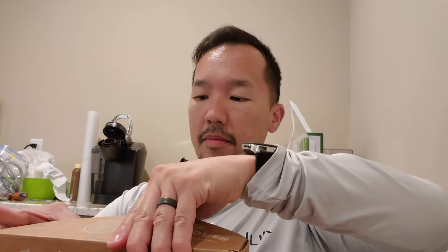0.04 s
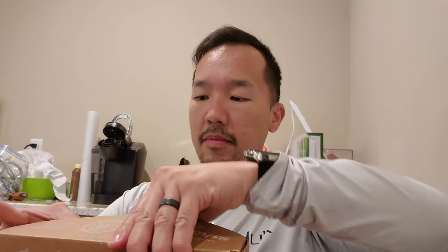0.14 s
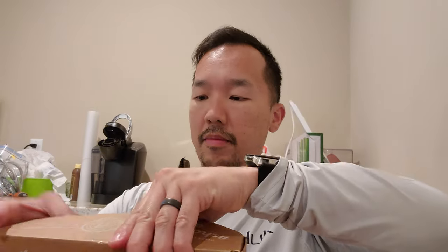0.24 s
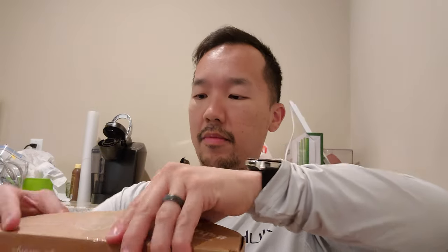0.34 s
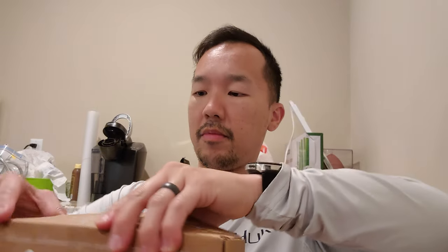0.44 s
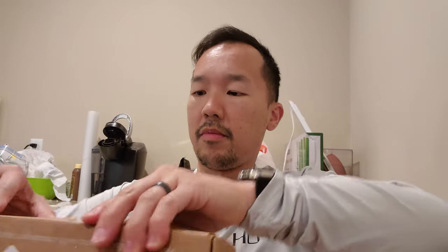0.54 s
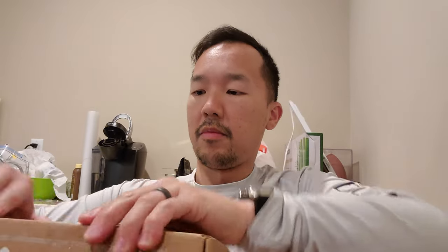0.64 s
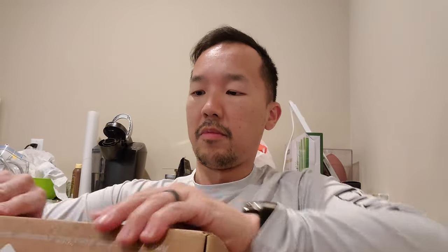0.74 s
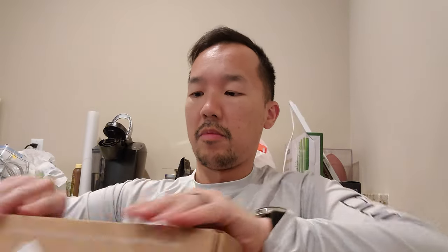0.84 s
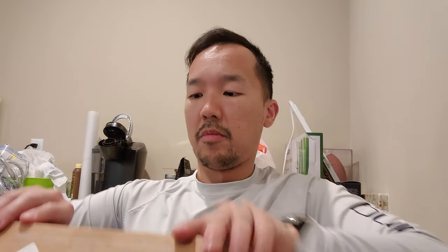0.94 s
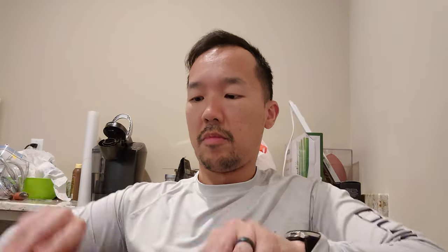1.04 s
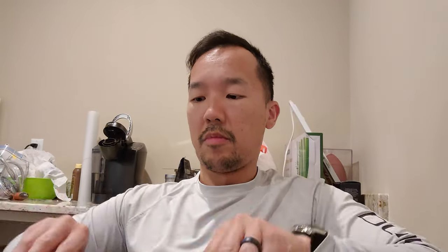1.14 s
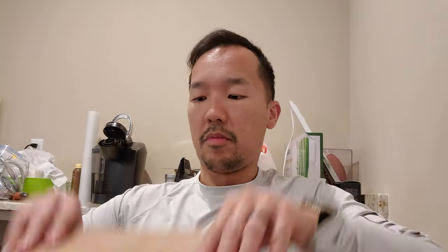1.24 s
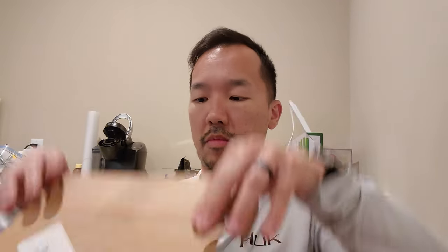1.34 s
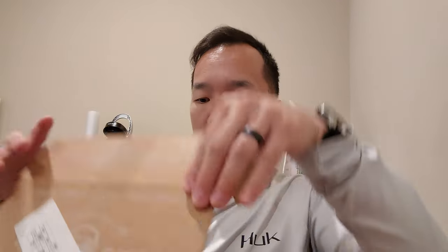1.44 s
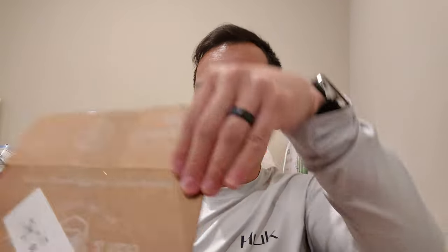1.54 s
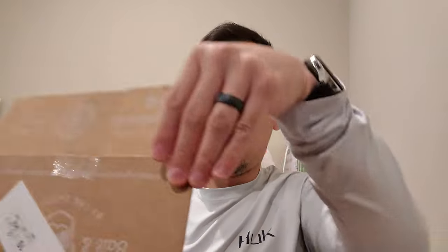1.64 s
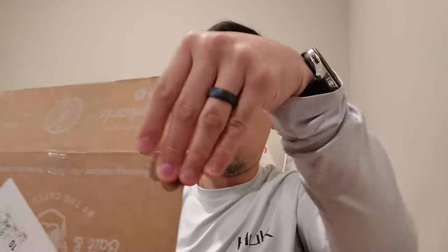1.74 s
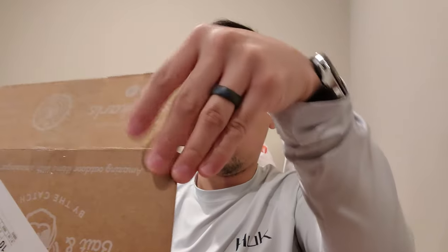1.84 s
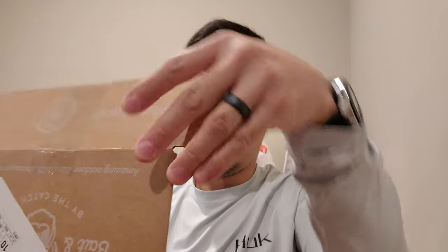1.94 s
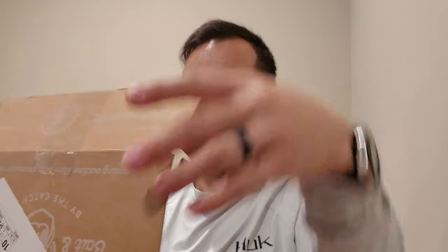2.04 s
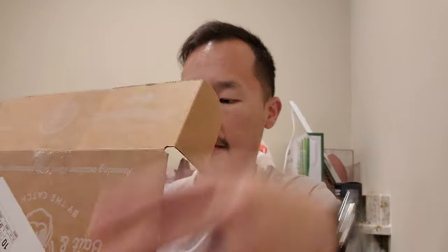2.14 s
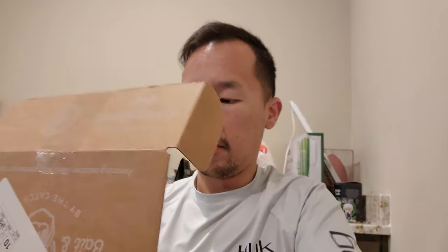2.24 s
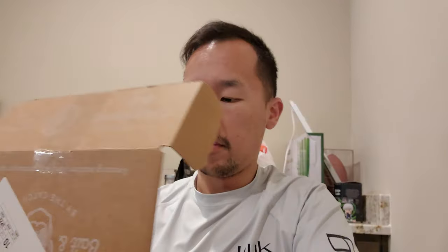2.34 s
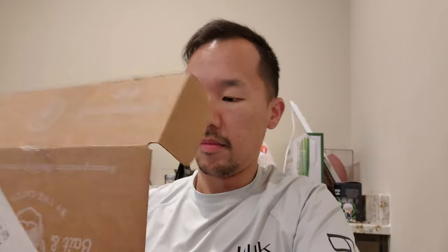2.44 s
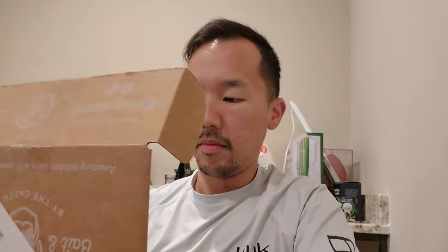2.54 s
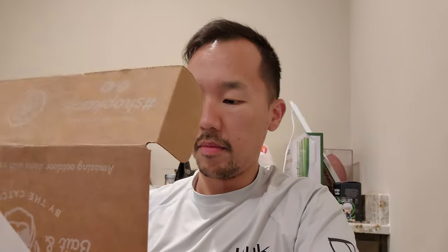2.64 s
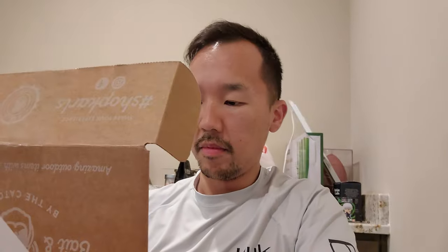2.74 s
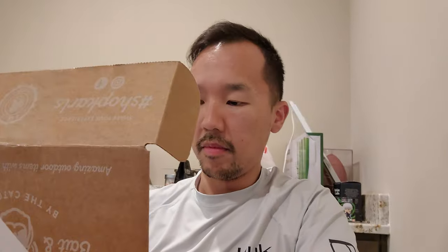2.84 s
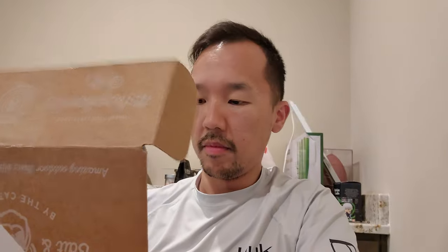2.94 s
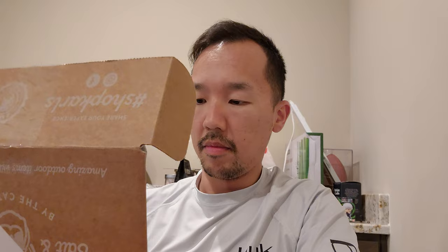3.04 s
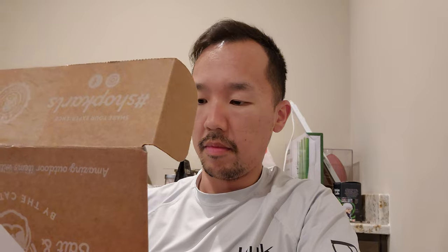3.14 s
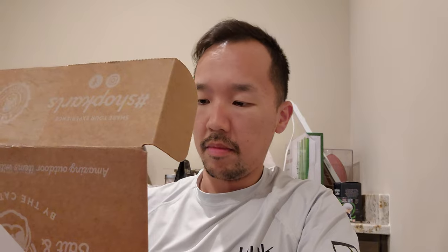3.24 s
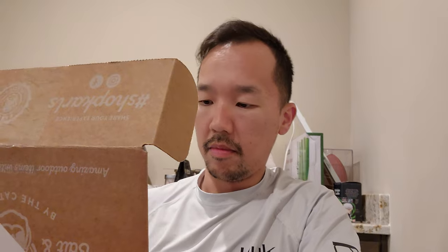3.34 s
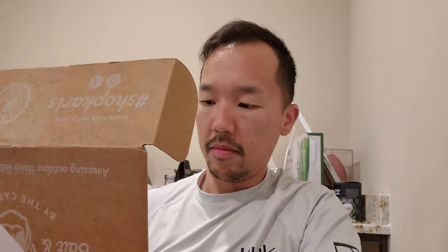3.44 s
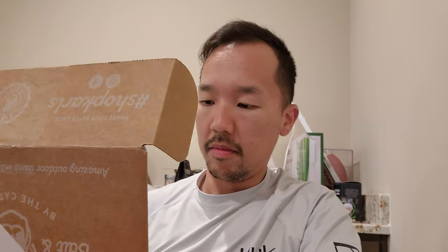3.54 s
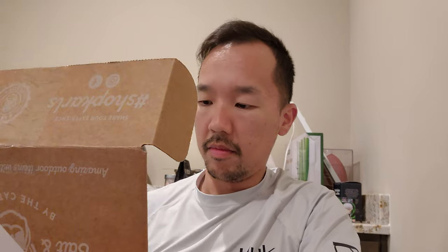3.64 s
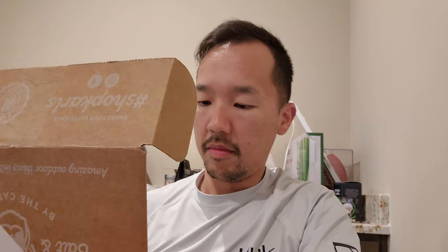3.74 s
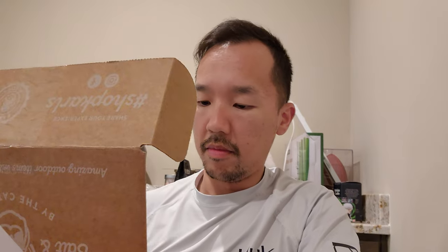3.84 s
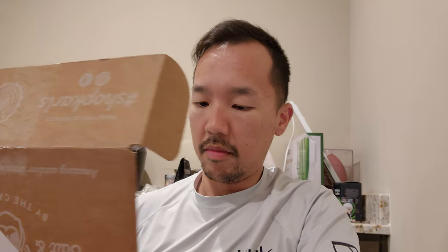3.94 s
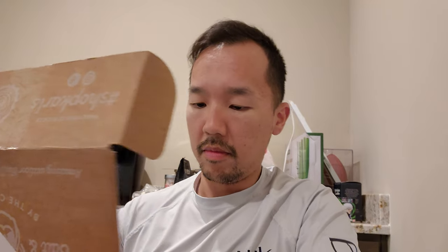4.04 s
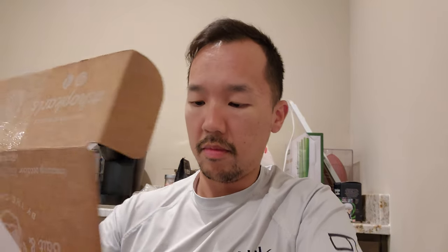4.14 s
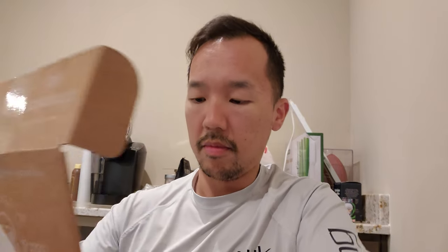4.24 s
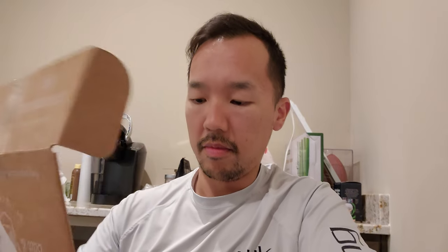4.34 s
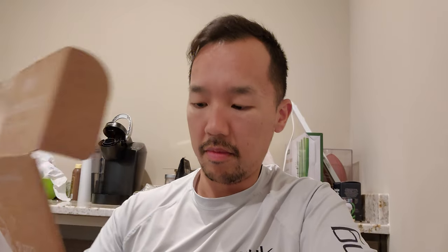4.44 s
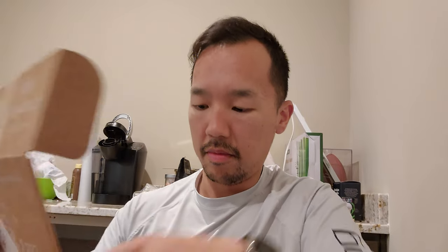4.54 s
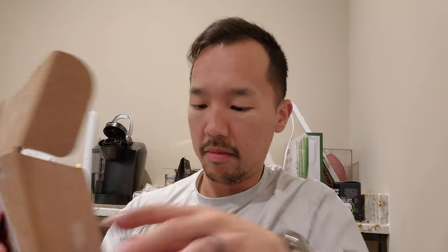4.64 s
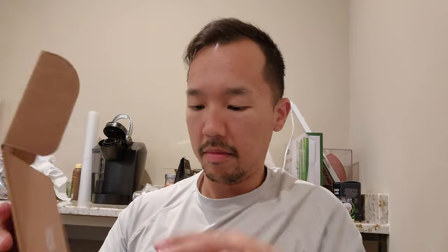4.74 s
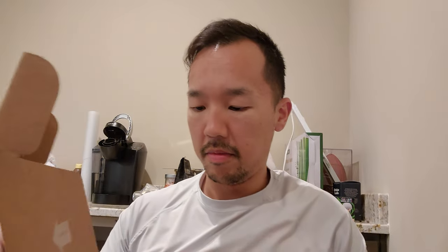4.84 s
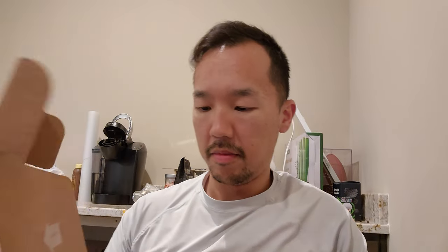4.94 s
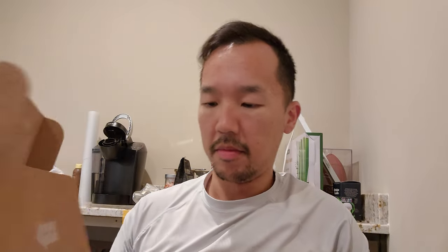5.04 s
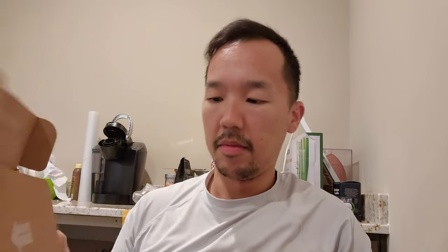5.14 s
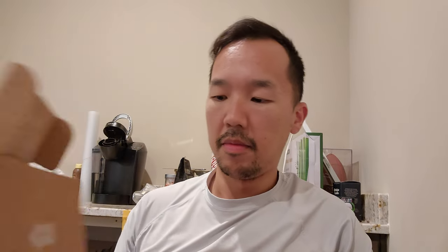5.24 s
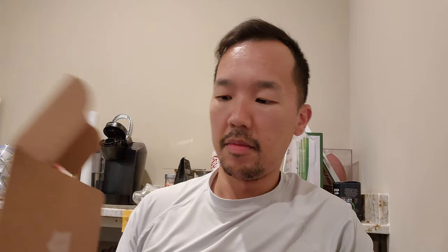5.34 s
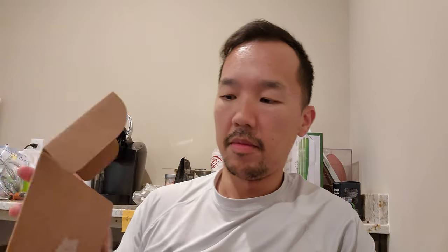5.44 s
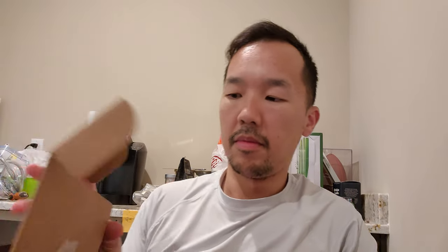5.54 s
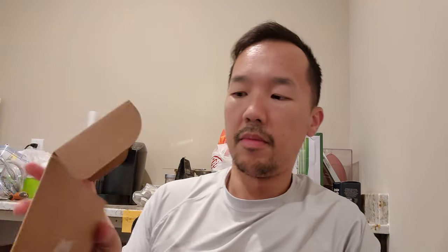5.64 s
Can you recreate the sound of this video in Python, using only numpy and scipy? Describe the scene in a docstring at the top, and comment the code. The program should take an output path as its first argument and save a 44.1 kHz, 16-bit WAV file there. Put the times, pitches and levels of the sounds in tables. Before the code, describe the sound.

Fingers tap and slide on a cardboard box lid, a tucked flap creaks and pops out with two thumps, then card rubs and knocks softly.

```python
"""Fingers slide and tap over the lid of a cardboard mailer box, close to the microphones in a small kitchen.
The tucked flap creaks, pops loose and scrapes out with two loud thumps; the lid is swung up and its
side flaps rub and knock against the walls of the box. Rubbing is coloured noise made of random snags,
knocks are decaying panel tones with a noisy crunch, creaks are short pips and rasps are wavering tones.
The counter top and the walls echo it all over a faint steady room murmur."""
import sys
import numpy as np
from scipy import signal
from scipy.fft import rfft, irfft
from scipy.io import wavfile
from scipy.ndimage import map_coordinates

SR = 44100
rng = np.random.default_rng(int(sys.argv[2]) if len(sys.argv) > 2 else 0)


def transcribe(signal):
    """Save signal, clipped to [-1, 1], as a 16-bit WAV file at the path in sys.argv[1]."""
    frames = np.atleast_2d(signal).T
    limited = np.clip(frames, -1, 1)
    pcm = np.round(limited * 32767).astype(np.int16)
    wavfile.write(sys.argv[1], SR, pcm)


N = 251370   # samples, 5.7 s
BANDS = 31.25 * 2 ** (np.arange(19) / 2)   # half-octave centres, Hz

# resonances of the box: mode_hz [Hz], relative_level_db [dB], t60_s [s, before each blow's ring factor]
BOX_RESONANCES = [(84, -19, .1), (120, -4, .26), (163, 1, .28), (186, -8, .55), (276, -6, .22),
                  (303, -5, .32), (365, -7, .45), (480, -5, .2), (630, -8, .2), (711, -8, .26),
                  (874, -7, .2), (988, -7, .2), (1108, -10, .25), (1528, -7, .14), (2080, -9, .14),
                  (2248, -10, .12), (3508, -14, .09)]
# friction spectrum of gripping fingers and of the wedged flap: freq_hz [Hz], relative_density_db [dB per Hz]
GRIP_SPECTRUM = [(60, -6.5), (130, -6), (350, 2), (650, -6.5), (950, -5.5), (1300, -6), (1700, -8),
                 (2800, -16), (4000, -15.5), (6400, -23.5), (9300, -35.5), (12500, -26.5), (16000, -29)]


def from_db(db):
    """Decibels to gain."""
    return 10 ** (np.asarray(db) / 20)


def rms_one(x):
    """Scale to unit power."""
    return x / np.sqrt(np.mean(x ** 2) + 1e-20)


def at_hz(points, hz):
    """Read a table along log frequency."""
    f, value = np.transpose(points)
    return np.interp(np.log(np.maximum(hz, 1)), np.log(f), value)


def rfft_hz(size):
    """Frequencies of the bins of a transform."""
    return np.arange(size // 2 + 1) * SR / size


def cut(x, hz, kind, order=2):
    """Causal Butterworth filter."""
    return signal.sosfilt(signal.butter(order, hz, kind, fs=SR, output="sos"), x)


def band_noise(size):
    """Independent half-octave noises, one row per band, each of unit power."""
    edge, run_in = 2 ** (1 / 4), 4000   # band edge ratio; samples dropped while the filter settles
    rows = []
    for hz in BANDS:
        noise = cut(rng.standard_normal(size + run_in), [hz / edge, hz * edge], "band")
        rows.append(rms_one(noise[run_in:]))
    return np.array(rows)


def wander(size, per_s):
    """Random knots joined by straight lines, scaled to a spread of about one."""
    knots = rng.standard_normal(400)
    position = np.arange(size) * per_s / SR
    return map_coordinates(knots, [position], order=1, mode="wrap") * np.sqrt(3 / 2)


def dying(t, t60):
    """Free exponential decay, 60 dB down after t60 seconds."""
    return np.exp(-np.log(1000) * t / np.maximum(t60, 1e-3))


def add(track, s, sound):
    """Mix a sound into a track at a time in seconds."""
    start = max(round(s * SR), 0)
    track[..., start:start + sound.shape[-1]] += sound[..., :N - start]


def pair(mid, side, hz):
    """Two close microphones hear diffuse sound alike only in the bass."""
    # left-right correlation of diffuse sound: freq_hz [Hz], correlation [-1 to 1]
    likeness = [(100, 0.9), (260, 0.92), (1000, -0.11), (5000, 0.13)]
    alike = np.clip(at_hz(likeness, hz), -.99, .99)
    return np.sqrt(1 + alike) * mid + np.sqrt(1 - alike) * side * np.array([[1], [-1]])


def pan(x, left_db):
    """Place a sound between the microphones by the left-over-right level difference."""
    return x * from_db([[left_db / 2], [-left_db / 2]])


def air():
    """The faint steady murmur of the room: diffuse noise shaped band by band."""
    # murmur spectrum: freq_hz [Hz], relative_density_db [dB per Hz]
    murmur = [(30, -14), (90, 0), (250, -2), (900, -14), (1250, -21), (2000, -18), (6000, -24), (9300, -33),
              (12000, -31), (16000, -38)]
    level_db = -69.5   # RMS ahead of the microphone filters
    total = 0
    for hz, mid, side in zip(BANDS, band_noise(N), band_noise(N)):
        band_gain = from_db(at_hz(murmur, hz)) * np.sqrt(hz)   # a wider band holds more power
        total = total + pair(mid, side, hz) * band_gain
    return from_db(level_db) * rms_one(total)


def wall_echoes(first_echo_s=0.0042, build_s=0.002):
    """Diffuse echoes from one position of the box; they die at their own rate in each band."""
    # decay of the kitchen: freq_hz [Hz], t60_s [s]
    decay = [(120, 0.3), (3000, 0.41), (15000, 0.25)]
    # echo level against the direct sound: freq_hz [Hz], level_db [dB]
    echo_level = [(100, -6), (300, -10), (1000, -3), (12000, 4)]
    t = np.arange(int(SR * .7)) / SR
    onset = np.clip((t - first_echo_s) / build_s, 0, 1)
    response = 0
    for hz, mid, side in zip(BANDS, band_noise(len(t)), band_noise(len(t))):
        shape = onset * dying(t, at_hz(decay, hz))
        share = hz * np.log(2) / SR   # part of the whole spectrum in this half octave
        gain = np.sqrt(share / len(t)) * from_db(at_hz(echo_level, hz))
        response = response + rms_one(pair(mid, side, hz) * shape) * gain
    return response


def kitchen(x, turns_per_s=3.0):
    """As the box moves, its sound passes back and forth between two patterns of wall echoes."""
    angle = 2 * np.pi * turns_per_s * np.arange(N) / SR
    out = 0
    for share in (np.cos(angle), np.sin(angle)):
        out = out + signal.fftconvolve((x * share)[None], wall_echoes(), axes=1)[:, :N]
    return out


def counter_echo(x, echo_db=-5.0, above_hz=1300):
    """The counter top throws the treble back, by a different path to each microphone."""
    out = np.zeros((2, N))
    for channel, lag_s in enumerate([.0013, .0021]):
        add(out[channel], lag_s, from_db(echo_db) * cut(x, above_hz, "high", order=1))
    return out


def creak(trim_db):
    """Each slip of the wedged flap is a short hollow pip that swells over a cycle or two."""
    # jerks of the flap: start_s [s], level_db [dB, before the trim]
    slips = [(.803, -51), (.808, -50), (.823, -47), (.836, -48), (.848, -48), (.858, -48), (.867, -52)]
    # resonances of the flap: mode_hz [Hz], relative_level_db [dB], t60_s [s]
    flap_modes = [(905, -3, .018), (1005, 2, .02), (1110, -2, .018)]
    out, t = np.zeros(N), np.arange(SR // 10) / SR
    ringing = sum(from_db(db) * np.sin(2 * np.pi * hz * t) * dying(t, t60) for hz, db, t60 in flap_modes)
    pip = (1 - np.exp(-t / .001)) * ringing
    for s, db in slips:
        add(out, s, from_db(db + trim_db) * pip)
    return cut(out, [650, 2200], "band")


def colour(x, spectrum, peak_db=0.8, mode_width=0.012):
    """The transform of friction: a broad spectrum with the modes of the box standing out of it."""
    hz = rfft_hz(len(x))
    modes = np.array(BOX_RESONANCES)[:, :1]
    near_mode = (1 / (1 + ((hz - modes) / (mode_width * modes)) ** 2)).max(0)
    return rfft(x) * from_db(at_hz(spectrum, hz) + peak_db * near_mode)


def rub(gesture, spectrum, snags_per_s, trim_db=1.3):
    """Card drags over card: fibres snag and let go at random, shaking the panel and hissing at the edge."""
    # strokes: gesture, start_s, swell_s, hold_s, fade_t60_s [s],
    # scrape_db, panel_rumble_db, fibre_hiss_db [dB, before the trim]
    strokes = [("grip", 0.0, .02, .075, .11, -66, -64, -77), ("grip", 0.185, .012, .16, .2, -74, -66, -80),
               ("grip", 0.41, .03, .08, .2, -69, -60, -73), ("grip", 0.54, .05, .02, .1, -57, -49, -59),
               ("grip", 0.63, .02, .055, .35, -54.5, -48.5, -62),
               ("wedge", 0.75, .03, .08, .15, -67, -64, -75),
               ("wedge", 0.89, .02, .003, .08, -49, -44, -55),
               ("pull", 0.908, .007, .01, .18, -38, -38, -53),
               ("pull", 0.925, .03, .033, .16, -42.5, -40.5, -51),
               ("pull", 1.015, .025, .115, .13, -49, -47, -57),
               ("pull", 1.18, .045, .008, .37, -48, -42.5, -55.5),
               ("pull", 1.29, .04, .06, .75, -67, -58, -69), ("lift", 1.82, .1, .035, .12, -57.5, -57, -69),
               ("lift", 2.01, .025, .005, .15, -62, -61, -63),
               ("lift", 2.26, .05, .005, .17, -60, -62, -57), ("lift", 2.36, .02, .1, .8, -77, -68, -80),
               ("shift", 2.974, .015, .012, .16, -65, -60, -74),
               ("shift", 3.03, .02, .07, .12, -76, -67, -90), ("shift", 3.13, .02, .055, .2, -70, -67, -82),
               ("shift", 3.19, .028, .015, .11, -64, -80, -63),
               ("swing", 4.233, .025, .18, .2, -60.5, -63, -65),
               ("swing", 4.44, .015, .1, .15, -60, -60, -64), ("swing", 4.29, .03, .1, .2, -65, -56, -73),
               ("swing", 4.555, .04, .006, .18, -51, -55, -55.5),
               ("swing", 4.68, .04, .005, .18, -69, -65, -71),
               ("swing", 4.805, .012, .07, .3, -74, -69, -80),
               ("flap", 4.977, .03, .015, .08, -60, -60, -68),
               ("flap", 5.02, .025, .005, .09, -57, -57.5, -61),
               ("fold", 5.15, .055, .015, .13, -57, -53.5, -60),
               ("fold", 5.25, .03, .035, .14, -63, -59, -65), ("fold", 5.48, .09, .012, .17, -68, -64, -72),
               ("fold", 5.678, .024, .01, .2, -60, -62, -63)]
    # a wide panel reaches the two microphones out of step: freq_hz [Hz], phase_spread [radians]
    panel_spread = [(200, .05), (1000, .3), (5000, .7)]
    rows = np.array([row[1:] for row in strokes if row[0] == gesture])
    s, swell_s, hold_s, fade_t60, scrape_db, rumble_db, hiss_db = rows.T[:, :, None]
    size, out = 2 ** 16, np.zeros((2, N))
    t, hz = s.min() + np.arange(size) / SR, rfft_hz(size)

    # each stroke gathers speed, holds it and dies away
    fade = dying(np.maximum(t - s - swell_s - hold_s, 0), fade_t60)
    speed = np.clip((t - s) / swell_s, 0, 1) * fade

    snag_spread_db, smooth_db = 4.5, -7   # uneven snag strength; steady noise under the snags
    snag_db = snag_spread_db * np.minimum(rng.exponential(1, size), 3)
    snags = (rng.random(size) < snags_per_s / SR) * rng.choice([-1, 1], size) * from_db(snag_db)
    friction = rms_one(snags) + from_db(smooth_db) * rng.standard_normal(size)
    friction = colour(friction, spectrum)
    phase = at_hz(panel_spread, hz) * wander(len(hz), 120)   # wanders along frequency
    friction = friction * np.exp(1j * phase * [[1], [-1]])

    def part(low, high):
        """The friction between two frequencies."""
        return irfft(friction * ((hz >= low) & (hz < high)))

    def range_level(low, high, db):
        """The strokes' level over time, divided by the loudness of the friction in this range."""
        return np.linalg.norm(speed * from_db(db + trim_db), axis=0) / part(low, high).std()

    # rumble, scrape and hiss each have their own level and blend into one another
    rumble = range_level(60, 1150, rumble_db)
    scrape = range_level(1150, 5500, scrape_db)
    hiss = range_level(5500, 16000, hiss_db)
    patchy_db, patches_per_s, judder_db, judders_per_s = 2.4, 40, 2.8, 60
    edges, stroke = np.geomspace(40, 17000, 34), 0   # band edges, Hz
    for low, high in zip(edges, edges[1:]):
        deep = at_hz([(800, 1), (1500, 0)], low)
        bright = at_hz([(4400, 0), (6500, 1)], low)
        level = rumble ** deep * scrape ** (1 - deep - bright) * hiss ** bright
        # the moving contact favours now some panel modes, now others
        patches = from_db(patchy_db * wander(size, patches_per_s))
        stroke = stroke + part(low, high) * level * patches
    add(out, s.min(), stroke * from_db(judder_db * wander(size, judders_per_s)))
    return out


def grip():
    """Fingers slide over the lid, the friction shaking the whole panel."""
    return rub("grip", GRIP_SPECTRUM, snags_per_s=1200)


def wedge():
    """The wedged flap rubs in its slot, to the right."""
    return pan(rub("wedge", GRIP_SPECTRUM, snags_per_s=1100), left_db=-3.0)


def pull():
    """The tucked flap scrapes out, card against card."""
    # friction spectrum: freq_hz [Hz], relative_density_db [dB per Hz]
    spectrum = [(60, -13), (120, -2), (450, 1.5), (1000, -7.5), (1300, -17), (2050, -13.5), (2800, -21),
                (3900, -18), (5300, -22), (6600, -15), (9500, -23), (12500, -15), (16000, -17)]
    return rub("pull", spectrum, snags_per_s=1300)


def lift():
    """Card rubs as the lid is lifted, slightly to the right."""
    # friction spectrum: freq_hz [Hz], relative_density_db [dB per Hz]
    spectrum = [(60, 8), (120, 10.5), (350, 7), (680, -5.5), (920, -2.5), (1200, -7), (1650, 0),
                (2200, 3.5), (2800, -5), (3800, -2), (5200, -16), (9300, -48.5), (12000, -37), (16000, -40)]
    return pan(rub("lift", spectrum, snags_per_s=1200), left_db=-1.0)


def shift():
    """Short shifting rubs with dense snags."""
    # friction spectrum: freq_hz [Hz], relative_density_db [dB per Hz]
    spectrum = [(70, -4), (250, 3), (700, -2), (1200, -3), (1700, 6), (2700, 6.5), (4200, 4.5),
                (9300, -21.5), (12000, -13), (16000, -24)]
    return rub("shift", spectrum, snags_per_s=3400)


def swing():
    """Card rubs with dense snags as the lid swings up."""
    # friction spectrum: freq_hz [Hz], relative_density_db [dB per Hz]
    spectrum = [(60, -21), (130, -3), (260, -1.5), (680, -8), (900, -8), (1250, -20.5), (2150, -18.5),
                (2750, -20.5), (3400, -17.5), (4600, -20), (5600, -17), (9300, -32.5), (11500, -26.5),
                (16000, -31)]
    return rub("swing", spectrum, snags_per_s=3200)


def flap():
    """A side flap rubs against the box wall, slightly to the left."""
    # friction spectrum: freq_hz [Hz], relative_density_db [dB per Hz]
    spectrum = [(80, -4), (350, 5), (740, 11), (950, -2), (1280, -15), (1700, -10), (2120, -2), (2700, -17),
                (4400, -6), (5200, -18), (6000, -18), (9000, -28), (16000, -22)]
    return pan(rub("flap", spectrum, snags_per_s=1600), left_db=1.2)


def fold():
    """The closing rubs, card folding against card."""
    # friction spectrum: freq_hz [Hz], relative_density_db [dB per Hz]
    spectrum = [(70, -16), (150, -5), (290, 6), (390, -5), (490, 3), (680, -8), (900, -4), (1250, -13),
                (1750, -7), (2650, -14), (3900, -8), (6500, -20), (9300, -36), (11500, -26), (16000, -29)]
    return rub("fold", spectrum, snags_per_s=2200)


def rasps(judder_db=3):
    """Stick and slip drive one resonance of the dragged edge; it swells, judders, wavers and sinks in pitch."""
    # singing edges, pitched by where they are held: start_s, length_s [s], pitch_hz, width_hz [Hz], level_db [dB]
    edge_rasps = [(0.177, .05, 1550, 250, -60), (0.96, .04, 2150, 450, -45), (0.958, .05, 4000, 600, -49),
                  (1.165, .045, 3700, 400, -54), (1.218, .03, 5550, 900, -53), (1.86, .11, 2230, 400, -60),
                  (4.243, .055, 5750, 1700, -63), (4.305, .05, 1900, 900, -62),
                  (4.448, .05, 5700, 1700, -62), (4.98, .085, 2120, 380, -60), (4.982, .065, 730, 220, -59),
                  (4.995, .07, 4300, 1300, -63), (5.19, .11, 900, 220, -63), (5.292, .04, 5700, 800, -63),
                  (5.497, .065, 3300, 400, -68)]
    waver, sag = .015, .04   # shares by which the pitch wanders, and starts high and ends low
    out = np.zeros(N)
    for s, length_s, hz, width_hz, db in edge_rasps:
        size = int(length_s * SR)
        pitch = hz * (1 + sag * np.linspace(1, -1, size) + waver * wander(size, 50))
        phase = 2 * np.pi * np.cumsum(pitch) / SR
        # random sidebands widen the tone
        tone = wander(size, width_hz) * np.cos(phase) + wander(size, width_hz) * np.sin(phase)
        swell = np.sin(np.linspace(0, np.pi, size)) * from_db(judder_db * wander(size, 250))
        add(out, s, from_db(db) * rms_one(tone * swell))
    return out


def contacts():
    """Knocks, thuds and snaps as (start, pitch, force spectrum, ring factor); the spot hit sets the pitch."""
    # a card edge knocks on the box: start_s [s], force_db [dB], pitch_hz [Hz],
    # fall_above_pitch [dB per octave], crack_db [dB], ring_factor [times t60]
    knocks = [(0.176, -41, 350, 8, -55, .5), (0.198, -41, 310, 14, -64, .7), (0.301, -53, 750, 6, -57, .6),
              (0.407, -51, 650, 6, -62, .43), (0.550, -35, 410, 7, -56, .35),
              (0.569, -35, 340, 5, -45, .45), (0.589, -41, 450, 3, -39, .35), (0.619, -40, 780, 8, -60, .4),
              (0.638, -38, 230, 7, -49, .3), (0.665, -34, 400, 9, -42, .3), (0.908, -25, 390, 1, -38, .6),
              (0.916, -22, 560, 2, -36, .34), (1.000, -31, 320, 5, -48, .4), (1.034, -42, 800, 3, -47, .4),
              (1.163, -22, 400, 5, -30, .65), (1.192, -30, 370, 7, -41, .7), (1.222, -32, 290, 9, -47, .85),
              (1.243, -34, 430, 10, -60, .6), (1.393, -55, 450, 5, -52, .89),
              (1.947, -41, 330, 7, -50, .45), (2.343, -45, 280, 7, -53, .43), (2.992, -50, 520, 5, -57, .4),
              (3.089, -47, 480, 6, -62, .39), (3.255, -42, 450, 24, -62, .75),
              (4.353, -38, 290, 11, -58, .65), (4.571, -45, 380, 12, -65, .35),
              (4.604, -44, 250, 8, -56, .6), (5.043, -53, 340, 4, -56, .8), (5.274, -34, 490, 10, -52, .45),
              (5.277, -35, 265, 8, -55, .55), (5.299, -37, 260, 8, -56, .5)]
    # force of the crack in a knock: freq_hz [Hz], relative_force_db [dB against crack_db]
    crack_force = [(1300, -6), (2100, -.5), (4000, 1), (8200, -18), (13000, -12)]
    # a whole panel is bumped softly: start_s [s], force_db [dB], pitch_hz [Hz], ring_factor [times t60]
    thuds = [(0.177, -46, 125, .6), (0.637, -34, 140, .2), (0.664, -32, 130, .25), (0.909, -25, 175, .4),
             (0.954, -38, 135, .6), (1.161, -26, 163, .85), (1.198, -28, 115, .35), (1.850, -39, 85, .25),
             (1.888, -36, 88, .18), (2.263, -49, 170, .45), (2.311, -28, 130, .17), (4.237, -40, 100, .2),
             (4.353, -43, 165, .5), (4.600, -46, 122, .6), (4.811, -50, 140, .3), (4.857, -50, 180, .35),
             (5.468, -51, 205, .4)]
    # faint rattle in a thud: freq_hz [Hz], relative_force_db [dB against the thud]
    rattle_force = [(1000, -40), (3000, -33), (13000, -41)]
    # stiff fibres snap: start_s [s], force_db [dB], pitch_hz [Hz]
    snaps = [(0.047, -47, 6000), (0.301, -53, 12000), (0.378, -44, 14000), (0.910, -16, 14000),
             (0.973, -31, 2200), (0.979, -30, 2200), (1.223, -39, 7000), (2.038, -49, 10000),
             (2.2, -60, 3000), (2.263, -53, 4000), (2.546, -41, 5300), (2.548, -47, 14000),
             (2.644, -60, 2500), (2.725, -56, 2500), (3.255, -36, 2700), (4.811, -53, 4000),
             (5.505, -35, 13000)]
    # falls of the force away from the pitch, dB per octave
    knock_low, thud_low, thud_high, snap_fall = 22, 13, 14, 11
    for s, db, pitch, fall, crack_db, ring in knocks:
        lowest_db = db - knock_low * np.log2(pitch / 44)
        upper_db = db - fall * np.log2(1000 / pitch)
        body = [(44, lowest_db), (pitch, db), (1000, upper_db)]
        yield s, pitch, body + [(hz, crack_db + rel) for hz, rel in crack_force], ring
    for s, db, pitch, ring in thuds:
        # two octaves down, the pitch, two octaves up
        body = [(pitch / 4, db - 2 * thud_low), (pitch, db), (pitch * 4, db - 2 * thud_high)]
        yield s, pitch, body + [(hz, db + rel) for hz, rel in rattle_force], ring
    for s, db, pitch in snaps:
        yield s, pitch, [(hz, db - snap_fall * abs(np.log2(hz / pitch))) for hz in BANDS], .3


def blows(modes_db=-2, crunch_db=2.2, damping_slope=0.45):
    """A blow rings the panel, the box modes and a dense crunch of panel modes that dies sooner in the treble."""
    # the panel sounds its own pitch, stiff small spots hardly at all: freq_hz [Hz], level_db [dB against force]
    panel_response = [(400, 2), (2500, -12)]
    panel_cycles = 30   # cycles to die away, before the ring factor
    contact_s, rise_cycles, crunch_t60 = .001, .35, .04   # crunch t60 in s at 1 kHz, before the ring factor
    out, t = np.zeros(N), np.arange(SR // 2) / SR
    hz, mode_db, t60 = np.transpose(BOX_RESONANCES)[:, :, None]
    # neighbouring modes start in opposite directions
    tones = np.sin(2 * np.pi * hz * t) * (-1) ** np.arange(len(hz))[:, None]
    bands = BANDS[1:, None]
    noise, size = band_noise(N)[1:], SR // 6
    for k, (s, pitch, force, ring) in enumerate(contacts()):
        strength = from_db(at_hz(force, hz) + mode_db + modes_db + rng.normal(0, 1, hz.shape))
        box = (strength * tones * dying(t, t60 * ring)).sum(0)
        panel_gain = from_db(at_hz(force, pitch) + at_hz(panel_response, pitch))
        panel = panel_gain * np.sin(2 * np.pi * pitch * t) * dying(t, ring * panel_cycles / pitch)
        add(out, s, cut(panel, pitch / 2, "high") + box)

        # low panel waves take longer to build up
        rise = 1 - np.exp(-t[:size] / (contact_s + rise_cycles / bands))
        shape = rise * dying(t[:size], ring * crunch_t60 * (1000 / bands) ** damping_slope)
        # each blow takes a different stretch of noise, evened to the energy of its shape
        crunch = np.roll(noise, -k * size, axis=1)[:, :size] * shape
        crunch *= np.sqrt((shape ** 2).sum(1) / (crunch ** 2).sum(1))[:, None]
        add(out, s, (from_db(at_hz(force, bands) + crunch_db) * crunch).sum(0))
    return out


def scene():
    """The box stays near the middle, some gestures a little to one side, with echoes and room murmur."""
    rubbing = grip() + wedge() + pull() + lift() + shift() + swing() + flap() + fold()
    direct = creak(trim_db=8) + rubbing + rasps() + blows()
    mono = direct.mean(0)
    return air() + kitchen(mono) + counter_echo(mono) + direct


def record(dry):
    """The microphones lose the deepest bass; a steep filter cuts the top."""
    cutoff_hz = 15850
    thinned = cut(dry, 58, "high", order=3)
    return signal.sosfilt(signal.ellip(10, .2, 70, cutoff_hz, fs=SR, output="sos"), thinned)


dry = scene()
out = record(dry)
transcribe(out)
```